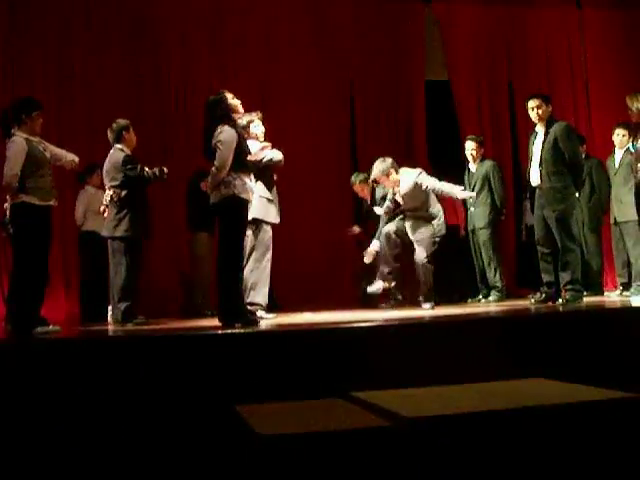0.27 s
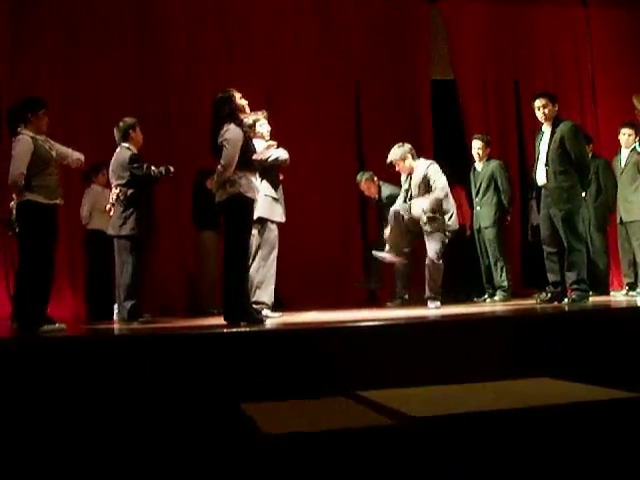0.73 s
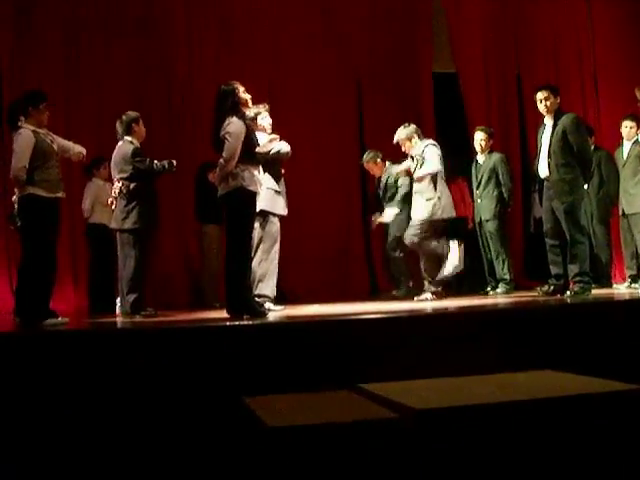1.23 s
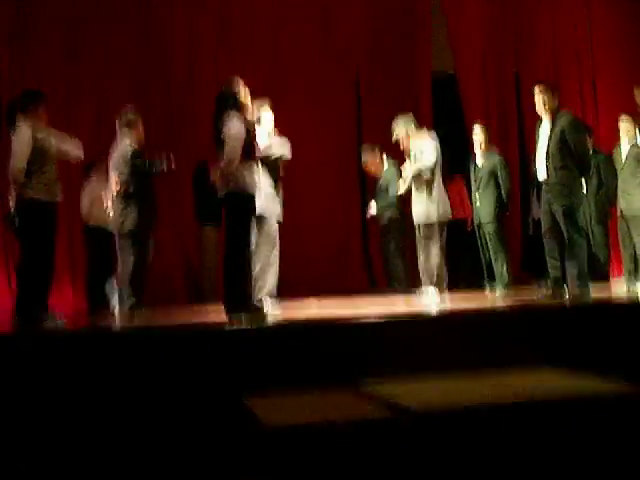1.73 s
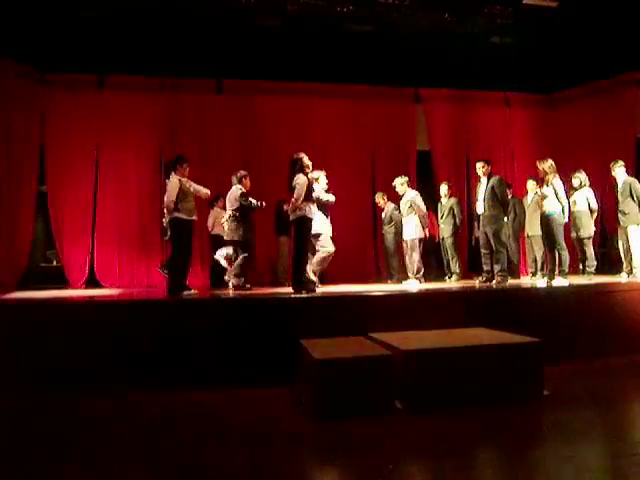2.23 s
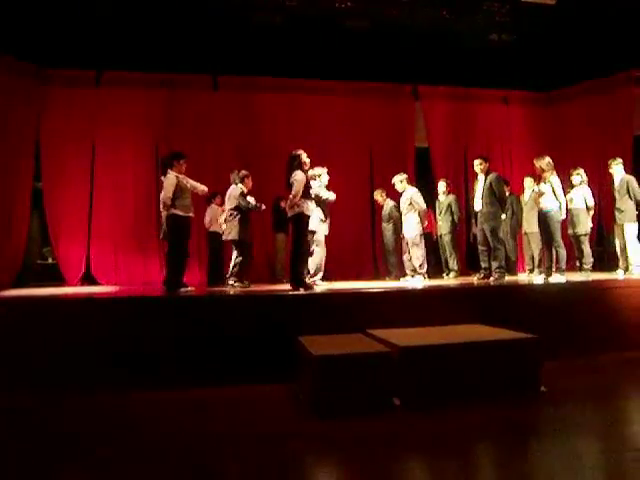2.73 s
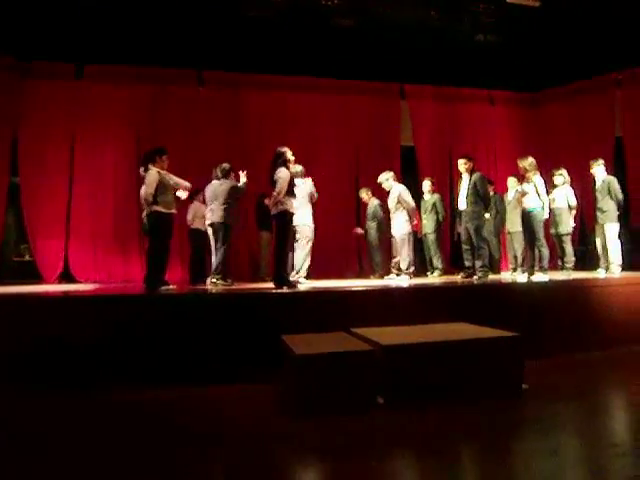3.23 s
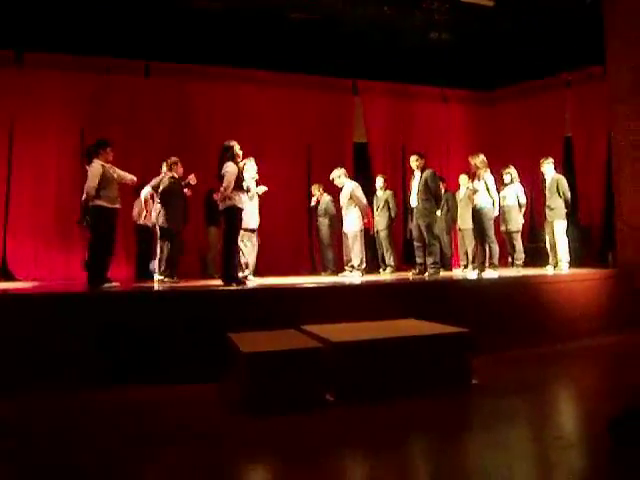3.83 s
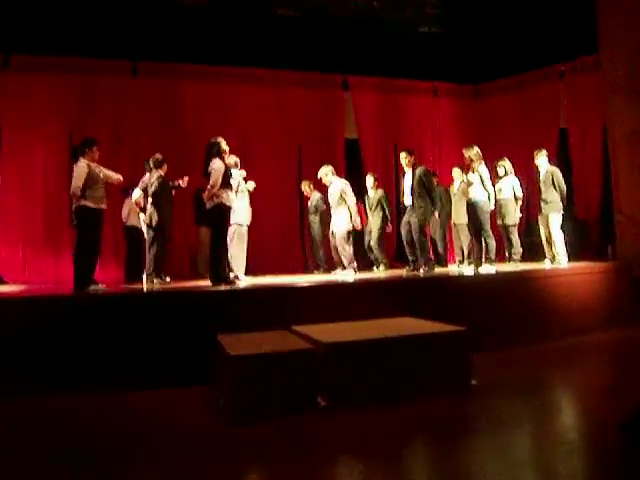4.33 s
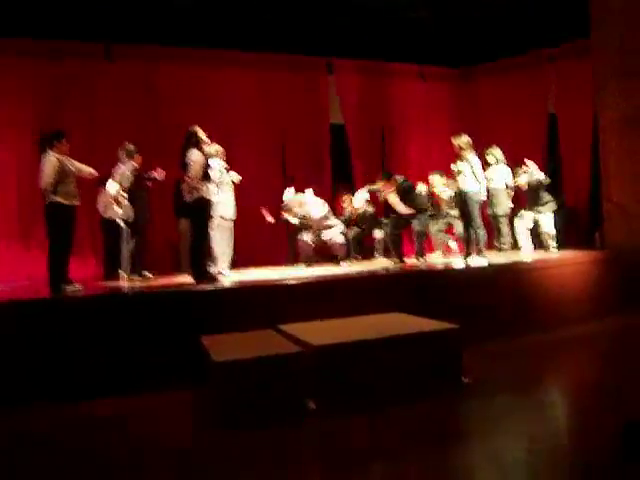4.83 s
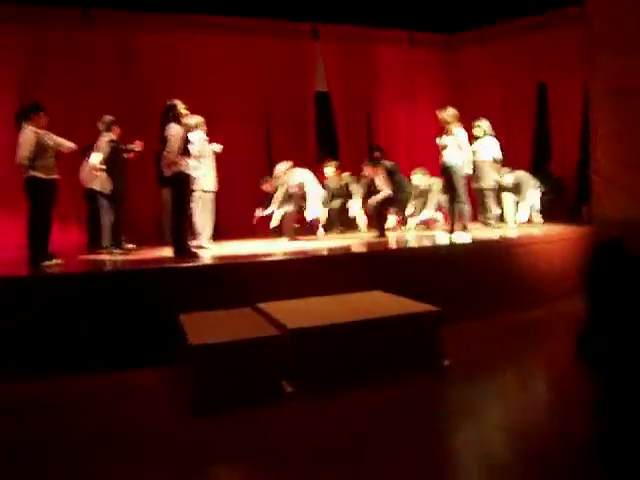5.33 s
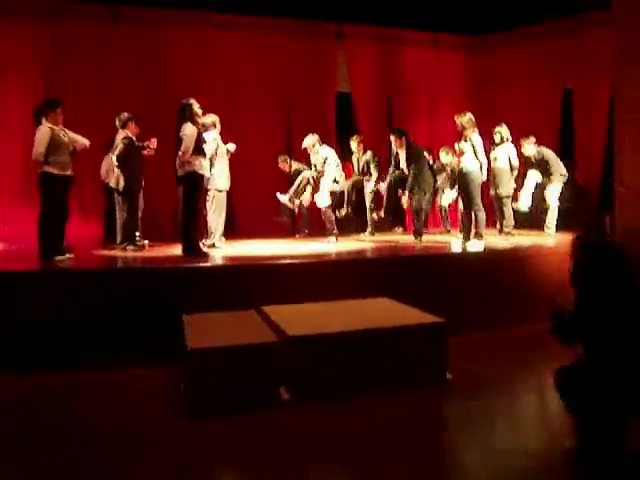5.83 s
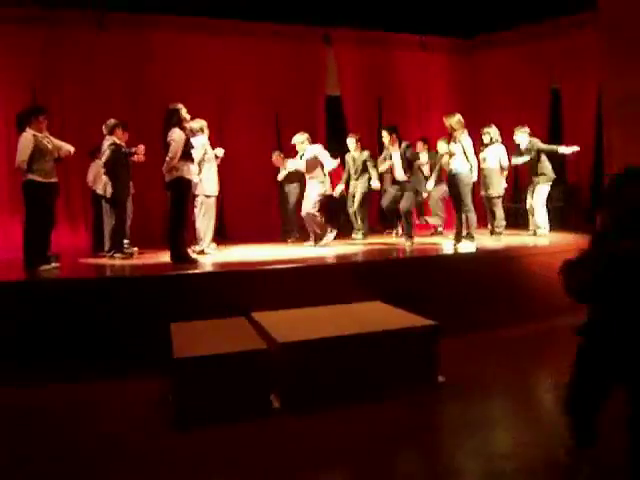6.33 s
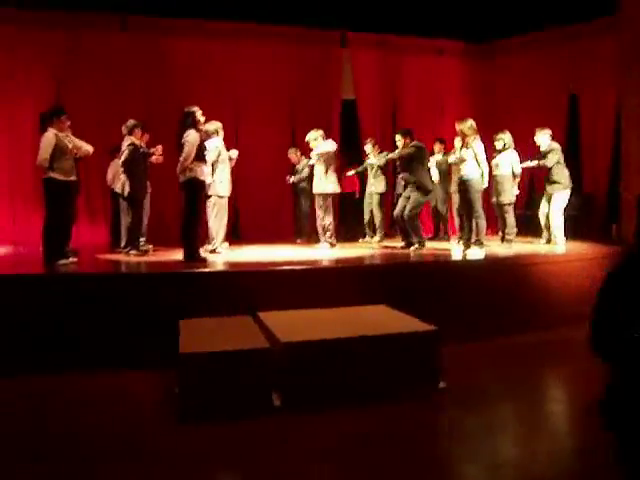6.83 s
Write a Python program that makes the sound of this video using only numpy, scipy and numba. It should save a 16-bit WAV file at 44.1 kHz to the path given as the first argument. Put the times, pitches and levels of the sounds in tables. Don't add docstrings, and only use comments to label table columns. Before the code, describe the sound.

Group body percussion in a theatre: heavy foot stomps thudding on resonant boards, loud cupped and flat claps, short hall echo, faint low air rumble.

```python
import sys
import numpy as np
from scipy import signal
from scipy.fft import rfft, irfft, next_fast_len
from scipy.io import wavfile
from numba import njit

SR = 44100
rng = np.random.default_rng(int(sys.argv[2]) if len(sys.argv) > 2 else 0)


def unload_wav(signal):
    wavfile.write(
        sys.argv[1],
        SR,
        np.round(np.clip(np.atleast_2d(signal).T, -1, 1) * 32767).astype(np.int16),
    )


def undo_db(level):
    steps = np.asarray(level, float) / 20
    return 10 ** steps


N = 312228
LEAD = SR // 2
SPOTS = 3

# frequency in Hz, level in dB.
AIR_SPECTRUM = [(12, -29), (20, -11.5), (66, -11.5), (159, -21.5), (211, -20), (304, -30), (813, -31),
                (4610, -40), (8160, -38.5), (9780, -64.5), (12700, -101), (21500, -120)]
# start in seconds, crack peak in dB, crack pitch in Hz, body weight in dB.
PAIR_STOMPS = [
    (-0.13, -13.5, 2700, -27.5),
    (0.102, -13.5, 2880, -21.5),
    (0.158, -15.5, 2630, -21),
    (0.179, -33, 1210, -30),
    (0.514, -50, 590, -49.5),
    (1.06, -8, 2100, -14),
    (1.151, -20, 1800, -20),
    (1.405, -6.5, 1830, -15),
    (1.538, -34, 1760, -37.5),
    (1.995, -68, 1270, -51.5),
]
FRONT_ROW_STOMPS = [(2.061, -15.5, 2760, -20.5), (2.088, -15.5, 2590, -25.5), (2.115, -19.5, 2720, -19),
                    (2.158, -11.5, 1890, -16), (2.179, -16.5, 2980, -18.5), (2.207, -23, 1820, -32),
                    (2.444, -4.5, 1960, -15), (2.455, -6.5, 1950, -13), (2.477, -25, 1780, -11.5),
                    (2.5, -9, 2000, -28), (2.749, -12, 1980, -10.5), (2.771, -14, 3200, -20.5),
                    (2.808, -13, 1970, -10), (2.833, -3, 1430, -14.5), (3.738, -16, 2190, -26.5),
                    (3.754, -11, 1840, -15), (3.765, -8, 1800, -14.5), (4.078, -10.5, 2020, -13),
                    (4.087, -12, 2060, -27), (4.11, -8.5, 1290, -15.5)]
TROUPE_STOMPS = [(4.68, -53, 1860, -43.5), (4.804, -5, 2000, -12), (4.818, -5, 2670, -13),
                 (4.843, 0.5, 1270, -20), (4.892, -5.5, 1270, -10.5), (5.136, -10, 2900, -19),
                 (5.201, -12, 1860, -19), (5.489, -15.5, 1380, -22.5), (5.508, -7.5, 2480, -21),
                 (5.559, -22.5, 1320, -16.5), (6.393, -4, 2020, -19), (6.418, -17.5, 1260, -17.5),
                 (6.477, -2, 1420, -12.5), (6.496, -14, 1350, -16), (6.718, -13, 2070, -17.5),
                 (6.749, -2.5, 1420, -25), (6.76, -9, 2220, -11.5), (6.778, -9.5, 1260, -13.5)]
# frequency in Hz, width in Hz, level in dB.
BOARD_MODES = [(380, 229, -3.5), (493.5, 235, 4.5), (711, 230, 5), (1200, 650, -4.5)]
# frequency in Hz, width in Hz, level in dB.
THUD_RESONANCES = [(150, 24.3, 4), (222, 67, 4), (300, 117, -2)]
# frequency in Hz, level in dB, 60 dB decay in seconds.
STAGE_MODES = [(42, 9, 0.13), (22.4, -1.5, 0.76), (27.91, -10.5, 1.35), (33.04, 7, 0.43), (38.3, -4.5, 1.2),
               (48.8, 2.5, 0.48), (54.96, -4, 0.82), (65.6, 0.5, 0.32), (80.48, -9.5, 1.32),
               (87.05, -5.5, 0.53), (98.4, -4, 0.59), (112.1, -5.5, 0.66), (141.6, -12.5, 0.58),
               (173.8, -15.5, 0.25)]
# frequency in Hz, 60 dB decay in seconds, level in dB.
HALL_BANDS = [(201, 0.75, 3), (406, 0.7, 7.5), (730, 0.73, 3), (1770, 0.82, -4.5), (3210, 0.64, 3.5),
              (5500, 0.46, -27.5), (9900, 0.42, 4.5)]
# delay in seconds, level in dB.
REFLECTIONS = [
    (.0115, -15),
    (.027, -17),
]
# start
# in seconds, level in dB, pitch in Hz, 60 dB decay in seconds, hall share in dB.
BOARD_TAPS = [(0.156, -19.5, 656, 0.02, -12.5), (0.183, -26, 490, 0.05, -2.5), (1.153, -20, 1920, 0.031, -4),
              (1.398, -40, 2000, .03, -9), (1.44, -22.5, 760, 0.047, 0.5), (2.148, -28, 6800, .015, -6),
              (2.206, -15.5, 740.7, 0.016, -4.5), (4.071, -23, 1510, .03, -10), (4.09, -15, 685.2, 0.04, -5),
              (5.15, -22.5, 150, 0.085, -1), (5.245, -21.5, 194, 0.061, -4),
              (5.508, -14, 2600, 0.014, -11.5), (5.897, -13, 2050, 0.021, 0), (6.5, -16.5, 1300, 0.023, 3),
              (6.7605, -4.5, 3130, 0.0095, -19),
              (.514, -37, 520, .015, -15),
    (.617, -42, 400, .015, -15),
    (1.818, -41, 3500, .01, -15),
    (6.36, -44, 420, .08, -10),
]
# start in seconds, level in dB, pitch in Hz, width in Hz,
# 60 dB decay in seconds, rasp in dB.
SOLE_SCUFFS = [
    (0.404, -32.5, 1780, 170, 0.25, 2),
    (0.421, -42, 300, 150, 0.88, 7),
    (4.78, -39, 694, 610, 0.025, -6),
    (6.199, -42, 278, 91.5, 0.53, -8),
]
# start in seconds, crack peak in dB, crack pitch in Hz, hall
# share in dB.
HAND_SLAPS = [(0.629, 1.5, 3150, -6.5), (1.819, -49, 1490, -19), (3.2528, 1.5, 1230, 3.5),
              (3.267, -16, 4330, -15.5), (3.271, -5.5, 1200, -4.5), (3.275, -11.5, 1660, -9),
              (3.286, -45, 1330, -10), (3.292, -15.5, 5400, -16), (3.296, 1.5, 966, -23),
              (3.305, 4, 4310, -9), (3.335, -14, 7200, 4), (5.124, -10, 3730, -6), (5.137, -5, 5800, -12),
              (5.142, -1.5, 2850, -5), (5.181, -2, 4100, -10), (5.242, -6.5, 2360, 2),
              (5.894, -1.5, 2210, -4.5), (5.989, 0, 2180, -0.5), (6.009, -33, 2800, 2),
              (6.083, -4, 5400, -1), (6.21, -28, 2930, 6.5)]
# frequency in Hz, width in Hz, level in dB.
PALM_CUP_MODES = [(336, 59, -4.5), (536, 180, -3.5), (704, 374, 16.5)]
# frequency in Hz, level in dB.
MIC_RESPONSE = [(5, -15), (20, 7.5), (5000, -2), (7000, -7), (8300, -17), (9400, -24), (10300, -44.5),
                (11500, 2), (16000, -49.5)]
# frequency in Hz, level in dB.
MIRROR_LEAK = [(11000, -45), (11800, -3), (13500, -26.5), (16000, -49)]


def band(x, hz, width):
    return signal.lfilter(*signal.iirpeak(hz, max(hz / width, 0.3), fs=SR), x)


def colour(x, points):
    size = next_fast_len(len(x))
    hz, db = np.transpose(points)
    bins_hz = np.arange(size // 2 + 1) * SR / size
    gain = undo_db(np.interp(np.log(bins_hz + 1), np.log(hz), db))
    return irfft(rfft(x, size) * gain, size)[:len(x)]


def fade(t60, size):
    return np.exp(-np.log(1000) * np.arange(size) / SR / t60)


def add(track, s, sound):
    i = int(s * SR) + LEAD
    track[i:i + len(sound)] += sound[:len(track) - i]


def struck(noise, t60, db, shape):
    t = np.arange(len(noise)) / SR
    rise_s = 0.0004
    near = shape(noise * (1 - np.exp(-t / rise_s)) * fade(t60, len(noise)))
    near = undo_db(db) * near / np.abs(near).max()
    spread = shape(1.0 * (t == 0))
    spread = spread * np.sqrt(np.sum(near ** 2) / np.sum(spread ** 2))
    return np.array([near, spread])


def air():
    noise = colour(rng.standard_normal(N), AIR_SPECTRUM)
    return undo_db(-54.5) * noise / noise.std()


def crack(noise, db, hz, treble_db):
    low_hz, high_hz = 1020, 3800
    low_cut = signal.butter(1, low_hz, "high", fs=SR, output="sos")

    def shape(x):
        body = band(x, np.sqrt(low_hz * high_hz), high_hz)
        pitched = undo_db(2) * band(x, hz, hz / 3.54)
        treble = undo_db(treble_db) * band(x, 6300, 6300 / 1.06)
        return signal.sosfilt(low_cut, body + pitched + treble)
    return struck(noise, 0.011, db, shape)


def knock(noise, db, modes, t60):
    def shape(x):
        total = 0
        for k, (hz, width, mode_db) in enumerate(modes):
            ring = band(band(x, hz, 2.3 * width), hz, 2.3 * width)
            total = total + (-1) ** k * undo_db(mode_db) * ring
        return total
    return struck(noise, t60, db, shape)


def stage_rings():
    hz, db, t60 = np.transpose(STAGE_MODES)[:, :, None]
    t = np.arange(SR) / SR
    push_s = 0.019
    return undo_db(db) * (1 - np.exp(-t / push_s)) * np.exp((2j * np.pi * hz - np.log(1000) / t60) * t)


def boom(rings, db):
    size, phase = rng.standard_normal((2, len(rings)))
    scatter_db, scatter_rad = 1.2, 0.55
    strength = undo_db(db - 10 + scatter_db * size) * np.exp(1j * scatter_rad * phase)
    return (strength @ rings).imag


def stomp_list():
    # hall share dB, board knock dB
    groups = (PAIR_STOMPS, 0.6, -8), (FRONT_ROW_STOMPS, 3.2, -9), (TROUPE_STOMPS, 0.0014, -7.5)
    slap_share = 0.24
    soles = []
    for rows, hall_db, boards_db in groups:
        for s, db, hz, weight_db in rows:
            knock_db = boards_db + weight_db + slap_share * (db - weight_db)
            soles.append((s, db, hz, knock_db, weight_db, hall_db))
    return soles


def stomps(near, lows, feet):
    rings = stage_rings()
    for k, (s, crack_db, hz, knock_db, weight_db, hall_db) in enumerate(stomp_list()):
        slap, wood, deep = rng.standard_normal((3, 3072))
        sole = crack(slap, crack_db, hz, treble_db=-31.5)
        boards = knock(wood, knock_db + 3, BOARD_MODES, t60=0.018)
        boards = boards + knock(deep, weight_db - 11, THUD_RESONANCES, t60=0.015)
        add(near, s, sole[0] + undo_db(-1.5) * boards[0])
        add(feet[k % SPOTS], s, undo_db(hall_db) * sole[1])
        add(feet[(k + 1) % SPOTS], s, boards[1])
        rattle = knock(slap[::-1], crack_db - 14.5, [(hz, 0.99 * hz, 0)], t60=0.043)
        add(near, s, rattle[0])
        thump = boom(rings, weight_db)
        add(lows, s + 0.0045, thump)
        add(lows, s + 0.15, undo_db(-6.5) * thump)


def hall():
    t = np.arange(SR) / SR
    tail = np.zeros(SR)
    for hz, t60, db in HALL_BANDS:
        tail += undo_db(db) * band(rng.standard_normal(SR), hz, 0.97 * hz) * fade(t60, SR)
    start_s, rise_s = 0.00042, 0.0095
    tail *= 1 - np.exp(-np.maximum(t - start_s, 0) / rise_s)
    walls_s, spread_s, walls_db = 0.024, 0.0045, 5
    tail *= undo_db(walls_db * np.exp(-0.5 * ((t - walls_s) / spread_s) ** 2))
    return undo_db(0.5) * tail / np.sqrt(np.sum(tail ** 2))


def heels(near, feet):
    for k, (s, db, hz, t60, hall_db) in enumerate(BOARD_TAPS):
        heel = knock(rng.standard_normal(SR // 10), db, [(hz, hz / 3.14, 0)], t60)
        add(near, s, heel[0])
        add(feet[k % SPOTS], s, undo_db(hall_db) * heel[1])


def scuffs(near, hands):
    for s, db, hz, width, t60, rasp_db in SOLE_SCUFFS:
        modes = [(hz, width, 0), (4200, 4500, rasp_db - 21)]
        rub = knock(rng.standard_normal(SR // 4), db, modes, t60)
        add(near, s, rub[0])
        add(hands[0], s, undo_db(-7) * rub[1])


def claps(near, hands):
    for k, (s, crack_db, hz, hall_db) in enumerate(HAND_SLAPS):
        flatness = np.log2(hz / 1200)
        cup_db = crack_db - 18 - 11.5 * flatness
        treble_db = -5.5 + 6.5 * flatness
        slap, cup = rng.standard_normal((2, 2048))
        palms = crack(slap, crack_db, hz, treble_db)
        pocket = knock(cup, cup_db + 3.5, PALM_CUP_MODES, t60=0.0057)
        add(near, s, palms[0] + pocket[0])
        add(hands[k % SPOTS], s, undo_db(hall_db) * palms[1])
        add(hands[(k + 1) % SPOTS], s, undo_db(hall_db) * pocket[1])


def scene():
    near, lows = np.zeros((2, N + LEAD))
    feet, hands = np.zeros((2, SPOTS, N + LEAD))
    stomps(near, lows, feet)
    heels(near, feet)
    scuffs(near, hands)
    claps(near, hands)
    far = hands + signal.lfilter(*signal.butter(1, 4200, fs=SR), feet)
    heard = near + lows
    for sound in far:
        heard += signal.fftconvolve(sound, hall())[:N + LEAD]
    for s, db in REFLECTIONS:
        late = int(s * SR)
        heard[late:] += undo_db(db) * near[:-late]
    return (heard[LEAD:] + air())[None]


@njit
def duck(x, top, slope, attack, release):
    y, e = np.empty(len(x)), top
    for i in range(len(x)):
        e += (abs(x[i]) - e) * (attack if abs(x[i]) > e else release)
        y[i] = x[i] * min(1.0, top / e) ** slope
    return y


def band_limit(x):
    return signal.sosfilt(signal.butter(12, 16300, fs=SR, output="sos"), x)


def record(dry):
    x = colour(dry[0], MIC_RESPONSE)
    attack_s, release_s = 0.006, 0.22
    x = duck(x, float(undo_db(-10)), 0.8, 1 / (attack_s * SR), 1 / (release_s * SR))
    n = np.arange(N)
    x = x + undo_db(-82) * np.sin(2 * np.pi * 8000 * n / SR)
    ceiling = 0.97
    x = x / (1 + (x / ceiling) ** 12) ** (1 / 12)
    x = x + undo_db(-25.5) * colour(x * rng.standard_normal(N), [(200, 0)] + MIC_RESPONSE[2:])
    x = signal.sosfilt(signal.ellip(8, 0.3, 60, 10250, fs=SR, output="sos"), x)
    x = x + colour(x * np.cos(np.pi * n), MIRROR_LEAK + [(SR / 2, -120)])
    x = x + undo_db(-98) * rng.standard_normal(N)
    return band_limit(x[None])


dry = scene()
out = record(dry)
unload_wav(out)
```